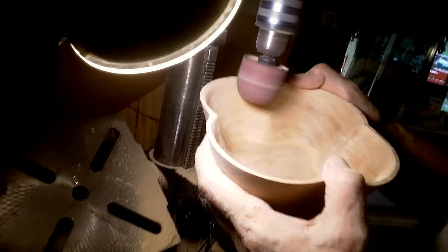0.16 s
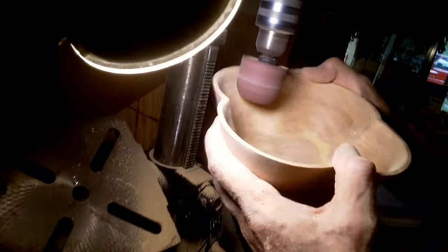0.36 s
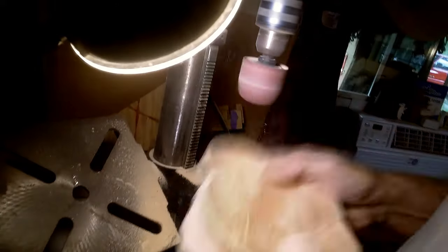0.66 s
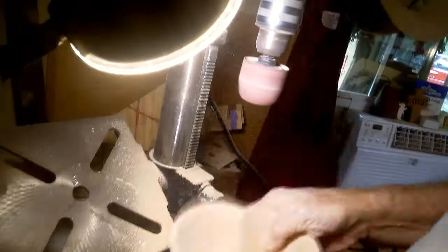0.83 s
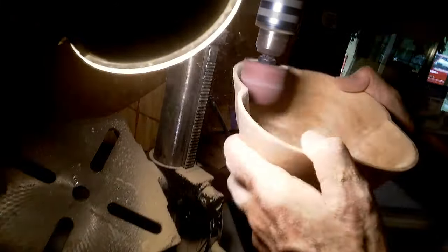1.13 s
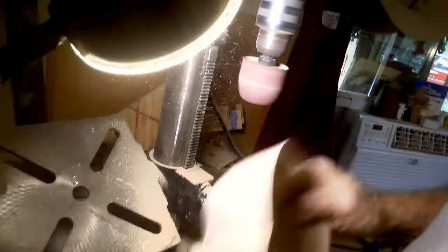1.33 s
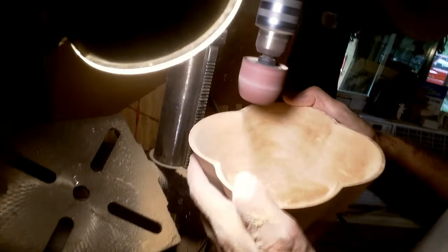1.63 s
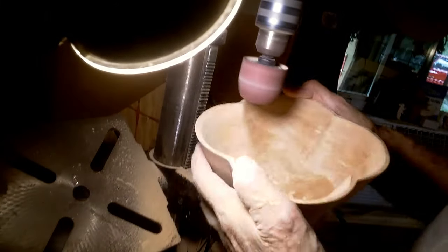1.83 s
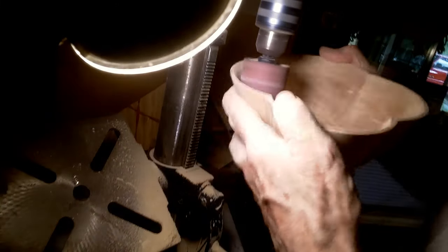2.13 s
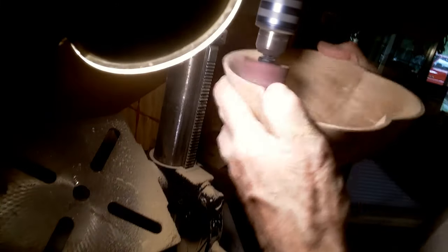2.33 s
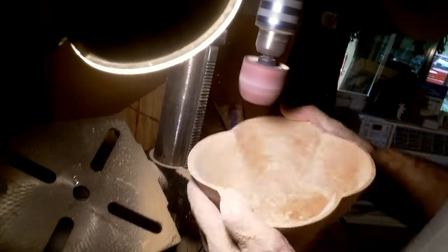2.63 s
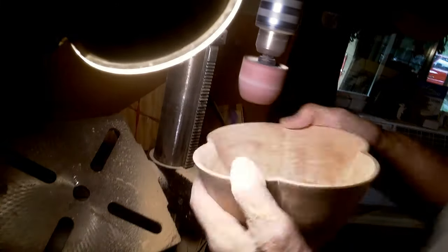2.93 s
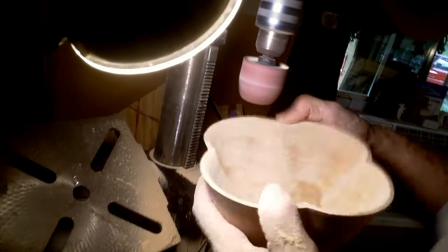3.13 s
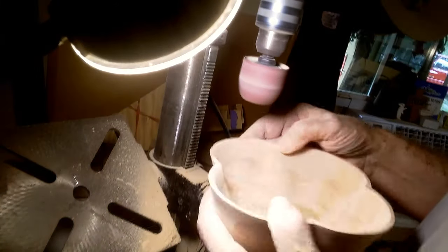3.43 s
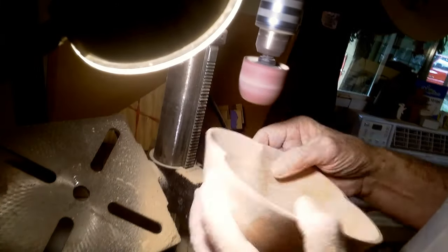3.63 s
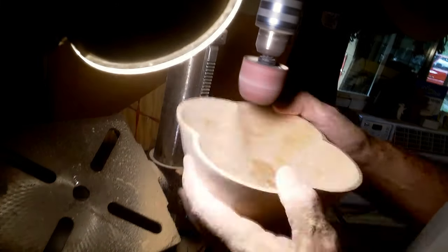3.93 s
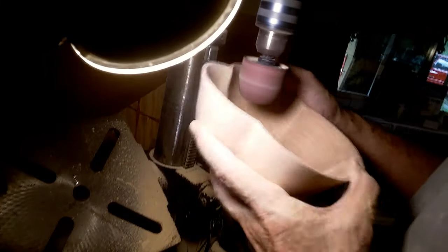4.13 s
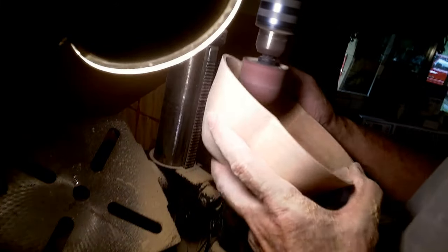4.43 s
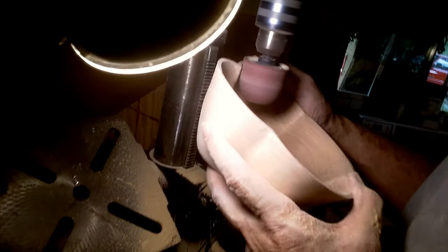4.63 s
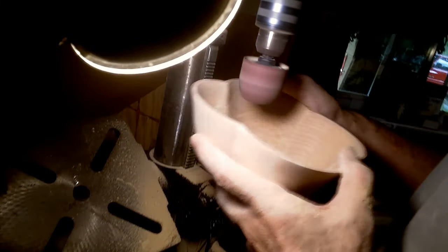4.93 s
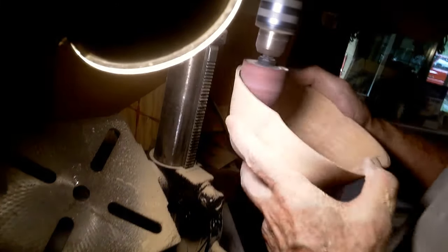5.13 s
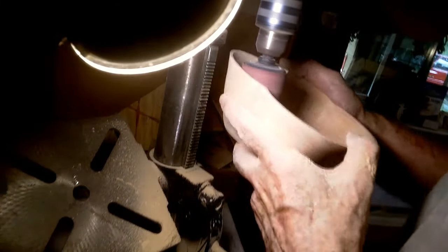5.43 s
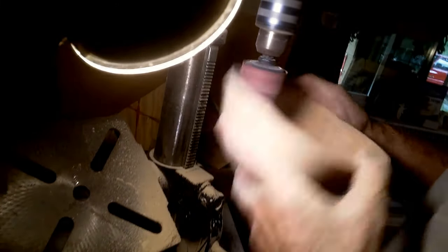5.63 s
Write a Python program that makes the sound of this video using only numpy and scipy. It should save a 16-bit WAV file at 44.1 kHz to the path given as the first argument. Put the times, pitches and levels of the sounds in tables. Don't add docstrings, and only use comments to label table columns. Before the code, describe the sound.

Bright sandpaper scratching on hollow wood arrives in separate strokes over a throbbing low motor drone. The first four strokes are smooth, raspy or dry; a pause of louder hum holds faint skin-on-wood wipes; then bouncing, ringing contacts lead to a long softer stroke. Close, dry camera sound with automatic gain pumping, slight room tail, and a loose, phasey stereo image with a duller right side.

```python
import sys
import numpy as np
from scipy import signal
from scipy.fft import rfft, irfft, next_fast_len
from scipy.io import wavfile
from scipy.ndimage import uniform_filter1d, minimum_filter1d, map_coordinates

SR = 44100
rng = np.random.default_rng(int(sys.argv[2]) if len(sys.argv) > 2 else 0)


def generate_wav(sig):
    pcm = np.round(np.clip(np.atleast_2d(sig).T, -1, 1) * 32767).astype(np.int16)
    wavfile.write(sys.argv[1], SR, pcm)


def amplitude_ratio(level_db):
    exponent = np.asarray(level_db, float) / 20
    return 10 ** exponent


N = 254456
TIME = np.arange(N) / SR

MOTOR_TONES = [51, 150.7, 177.6, 298.8, 360.7, 482.5, 777.9, 861.3, 1286.6]
# level_db, level_wander_db, pitch_wander_hz
TONE_WANDER = [(-24, 1.5, 1.7), (-5, 1, 1.197), (-3, 1, 0.74), (-23.5, 0.5, 1.5), (-20, 5.5, 2.47),
               (-11, 2, 2.5), (-33, 5, 3.98), (-32, -2, 4.22), (-30, -0.5, 9)]
# pitch_hz, level_db (per Hz)
RUMBLE_COLOUR = [(22, -30), (50, -13), (85, -10), (150, 4.5), (210, -6), (400, 1.5), (640, -8.5),
                 (1020, -21), (1300, -20), (2030, -35.5), (2800, -30), (6500, -45.5), (11000, -39),
                 (14320, -46)]
# pitch_hz, width_hz, level_db
HOUSING_RINGS = [(727, 4, -25.5), (11100, 770, -61), (2557, 370, -37.5), (3090, 220, -39),
                 (4600, 270, -38.5)]
# time_s, hiss_db
PRESSURE = [
    [(-.05, -47.5), (.09, -47), (.152, -44), (.224, -40.5), (.312, -43.5), (.404, -41.5), (.55, -40),
     (.619, -44)],
    [(.662, -42.5), (.68, -40.5)],
    [(1.067, -45), (1.185, -40), (1.249, -42)],
    [(2.026, -42.5), (2.107, -49), (2.145, -45), (2.28, -39.5), (2.36, -41.5), (2.445, -47.5), (2.49, -43),
     (2.537, -43.5)],
    [(2.864, -41.5), (2.866, -45)],
    [(4.268, -47), (4.295, -42.5), (4.34, -42), (4.42, -39), (4.49, -39), (4.572, -48)],
    [(4.625, -39), (4.7, -40.5), (4.742, -40), (4.81, -48.5), (4.852, -38.5), (4.879, -49)],
    [(5.037, -40.5), (5.1, -41.5), (5.27, -41.5), (5.341, -48.5), (5.47, -47), (5.545, -43), (5.6, -54),
     (5.642, -43)],
]
# fade_s, rasp_db, body_db, wall_ring_db, swing_per_turn_db
STROKE_SOUND = [
    (0.011, -11.5, 1.5, -17, -0.06),
    (0.015, -1, 5.5, -11.5, 0.5),
    (0.016, -12.5, -1.5, -31, -1),
    (0.015, -12.5, 3, -21, -0.1),
    (0.009, -20, -9, -31, 7),
    (0.017, -11.5, -1.5, -2.5, 1.5),
    (0.0062, -10.5, -0.5, -2.5, 2.5),
    (0.014, -15, -3, -14.5, 0),
]
# middle_s, half_length_s, depth_db
BOUNCES = [
    (4.288, 0.017, 19),
    (4.326, 0.0085, 14),
    (4.365, 0.0052, 6),
    (4.437, 0.0059, 6),
    (4.467, .0041, 7),
    (4.51, 0.0036, 2),
    (4.643, 0.014, 9),
    (4.679, 0.0027, 2),
    (4.804, 0.0025, 12),
    (4.834, 0.012, 7),
]
# middle_s, half_length_s, hiss_db
FINGER_WIPES = [
    (2.835, 0.026, -68),
    (3.23, 0.033, -62),
    (3.29, 0.022, -64),
    (3.388, .05, -60),
    (3.517, 0.018, -62.5),
    (5.772, 0.0055, -58),
]
# pitch_hz, level_db (per Hz)
HISS_COLOUR = [(4000, -27), (5500, -14.5), (8000, -8), (10000, -4), (11800, 1.5), (13000, -1),
               (14320, -13.5)]
# pitch_hz, level_db (per Hz)
RASP_COLOUR = [(1400, 0), (2000, -4.5), (2900, 3), (4000, 1), (5200, 2), (6500, -16.5), (8000, -10)]
# pitch_hz, level_db (per Hz)
BODY_COLOUR = [(120, -5), (250, 7), (550, 13.5), (800, 8), (1300, -3), (1900, -17), (2600, -5)]
# pitch_hz, width_hz, level_db
WALL_RINGS = [(930, 120, -4), (1190, 280, 3.5), (1460, 36, -23), (1738, 230, -0.5), (3430, 160, -7.5),
              (6470, 1400, -13)]
# pitch_hz, level_db, phase_rad
RIGHT_CHANNEL = [(40, -2, 1.1), (100, -3, 1.6), (145, -2.2, 2.0), (185, -2.2, 1.1), (250, -1.5, -2.3),
                 (300, -6, -2.3), (350, -13, -.7), (440, -8, -.95), (700, -3, -.4), (1100, -1.2, 0),
                 (3500, -1.5, 0), (6000, -4, 0), (10000, -12.5, 0), (14500, -21, 0)]
# pitch_hz, stray_rad
PHASE_STRAY = [(40, .35), (90, 1.0), (140, .2), (190, .2), (300, 1.1), (450, .4), (1100, .4), (1700, .8),
               (5500, .9), (7000, 1.6), (14000, 1.7)]
STEREO_BANDS = [48, 56, 64, 72, 80, 88, 96, 108, 120, 132, 144, 160, 176, 186, 196, 216, 240, 264, 292, 320]


def level(x, db):
    return x * amplitude_ratio(db) / np.sqrt(np.mean(x ** 2))


def colour(x, points):
    hz, db = np.transpose(points)
    size = next_fast_len(N)
    f = np.fft.rfftfreq(size, 1 / SR) + 1
    gain = amplitude_ratio(np.interp(np.log(f), np.log(hz), db, left=-90, right=-90))
    return level(irfft(rfft(x, size) * gain, size)[:N], 0)


def modes(x, table):
    rings = 0
    for hz, width_hz, db in table:
        b, a = signal.iirpeak(hz, hz / width_hz, SR)
        rings = rings + level(signal.lfilter(b, a, x), db)
    return rings


def walk(rate):
    k = int(SR / rate)
    steps = np.repeat(rng.standard_normal(N // k + 1), k)
    w = uniform_filter1d(uniform_filter1d(steps, k), k)[:N]
    return w / np.std(w)


def grit(flicker_db, spike_db):
    size = amplitude_ratio(spike_db * rng.exponential(size=N))
    flicker = amplitude_ratio(flicker_db * walk(220) + flicker_db * walk(30))
    return rng.standard_normal(N) * size * flicker


def motor():
    hum = 0
    for hz, (db, wander_db, wander_hz) in zip(MOTOR_TONES, TONE_WANDER):
        loudness = np.sqrt(2) * amplitude_ratio(db + wander_db * walk(16))
        phase = 2 * np.pi * np.cumsum(hz + wander_hz * walk(9)) / SR
        hum = hum + loudness * np.sin(phase + 7 * rng.random())
    belt_hz = 27.9 + 0.69 * walk(3.26)
    throb = np.sin(2 * np.pi * np.cumsum(belt_hz) / SR)
    shake = grit(0.25, 1.85) * amplitude_ratio(0.56 * throb)
    rumble = colour(shake, RUMBLE_COLOUR) * amplitude_ratio(-4)
    return hum + rumble + modes(shake, HOUSING_RINGS)


def gate(t0, t1, rise=0.0017, fall=0.006):
    return np.clip(np.minimum((TIME - t0) / rise, (t1 - TIME) / fall + 1), 0, 1) ** 2


def contact():
    return np.array([gate(rows[0][0], rows[-1][0], fall=stroke[0])
                     for rows, stroke in zip(PRESSURE, STROKE_SOUND)])


def pressure():
    s, db = np.transpose(np.vstack(PRESSURE))
    return np.interp(TIME, s, db)


def patchy(x, patch_db, patch_hz, patch_s):
    f, t, z = signal.stft(x, SR, nperseg=256)
    field = rng.standard_normal((40, 400))
    places = np.meshgrid(f / patch_hz, t / patch_s, indexing="ij")
    patches = map_coordinates(field, places, order=1, mode="wrap")
    return signal.istft(z * amplitude_ratio(patch_db * patches), SR, nperseg=256)[1][:N]


def sanding(press_db, on):
    _, rasp_db, body_db, ring_db, swing_db = np.transpose(STROKE_SOUND)
    drum_hz, low_spot_s = 27.5, 4.291
    throb = amplitude_ratio(-(swing_db @ on) * np.cos(2 * np.pi * drum_hz * (TIME - low_spot_s)))
    bounce = amplitude_ratio(-sum(db * np.exp(-((TIME - s) / half) ** 4) for s, half, db in BOUNCES))

    firm_db = -43
    rasp_push = amplitude_ratio(firm_db + 0.47 * (press_db - firm_db))
    body_push = amplitude_ratio(firm_db + 0.4 * (press_db - firm_db))

    grains = grit(1.2, 2.2)
    scratch = patchy(grains, patch_db=1.8, patch_hz=600, patch_s=0.04)
    wall = level(modes(modes(grains, WALL_RINGS), WALL_RINGS), 0)
    hiss = on.sum(axis=0) * amplitude_ratio(press_db) * colour(scratch, HISS_COLOUR)
    rasp = amplitude_ratio(rasp_db + 1.5) @ on * rasp_push * colour(scratch, RASP_COLOUR)
    body = amplitude_ratio(body_db - 4.5) @ on * body_push * colour(scratch, BODY_COLOUR)
    ring = amplitude_ratio(body_db + ring_db) @ on * body_push * wall
    return amplitude_ratio(5.0) * throb * bounce * (hiss + rasp + body + ring)


def gain_control(press_db, on):
    ceiling_db, squeeze, start_db = -56, 0.86, -11
    attack_s, hold_s, recover_db_per_s = 0.0037, 0.054, 41.5
    hiss_db = press_db + 20 * np.log10(on + 1e-9)
    want = -squeeze * np.maximum(hiss_db - ceiling_db, 0)
    want[0] = start_db
    hold = int(hold_s * SR)
    want = minimum_filter1d(want, hold, origin=(hold - 1) // 2)
    ramp = recover_db_per_s * TIME
    gain_db = ramp + np.minimum.accumulate(want - ramp)
    return uniform_filter1d(gain_db, int(attack_s * SR))


def workshop(near):
    t = np.arange(SR // 4) / SR
    tail = rng.standard_normal(len(t)) * np.exp(-np.log(1000) * t / 0.085) * (t > 0.004)
    tail = tail / np.sqrt(np.sum(tail ** 2))
    return amplitude_ratio(-47) * signal.fftconvolve(near, tail)[:N]


def wiping():
    on = sum(amplitude_ratio(db) * np.exp(-((TIME - s) / half) ** 4) for s, half, db in FINGER_WIPES)
    scratch = grit(2.5, 1.5)
    return on * (colour(scratch, HISS_COLOUR) + amplitude_ratio(-3.5) * colour(scratch, RASP_COLOUR))


def scene():
    press_db, on = pressure(), contact()
    near = sanding(press_db, on) + wiping()
    heard = motor() * amplitude_ratio(-36.5) + near + workshop(near)
    mono = heard * amplitude_ratio(gain_control(press_db, on.max(axis=0)))
    return np.array([mono, mono])


def right_channel(left):
    hz, db, phase = np.transpose(RIGHT_CHANNEL)
    f = np.fft.rfftfreq(N, 1 / SR) + 1
    place, points = np.log(f), np.log(hz)
    turn = np.interp(place, points, np.cos(phase)) + 1j * np.interp(place, points, np.sin(phase))
    gain = amplitude_ratio(np.interp(place, points, db)) * turn / np.abs(turn)
    late_inverted = -np.exp(-2j * np.pi * f * 20 / SR)
    return irfft(rfft(left) * gain * late_inverted, N)


def joint_stereo(left, right, weak_db=-11.5, busy_db=9, makeup_db=0.8):
    frames = dict(window=np.sin(np.pi * (np.arange(2048) + 0.5) / 2048), nperseg=2048)
    f, _, (l, r) = signal.stft(np.pad([left, right], ((0, 0), (6, 0))), SR, **frames)
    count = r.shape[1]
    height = f[:, None]

    hz, rad = np.transpose(PHASE_STRAY)
    stray = np.interp(np.log(f + 1), np.log(hz), rad)[:, None]
    draws = rng.random((2, len(f) // 14 + 1, count))
    spin, luck = np.repeat(draws, 14, axis=1)[:, :len(f)]
    loose = r * amplitude_ratio(makeup_db * stray) * np.exp(1j * stray * np.sqrt(12) * (spin - 0.5))

    loose[luck < 0.3 * np.clip((height - 5500) / 3000, 0, 1)] = 0
    top_hz = np.repeat(rng.uniform(12900, 14500, count), 3)[:count]
    loose[height > top_hz] = 0

    power = np.abs(l) ** 2
    busy = np.sqrt(power[f > 6000].sum(axis=0) / power.sum(axis=0))
    for a, b in zip(STEREO_BANDS, STEREO_BANDS[1:]):
        mid = np.sum(np.abs(l[a:b] + r[a:b]) ** 2, axis=0)
        side = np.sum(np.abs(l[a:b] - r[a:b]) ** 2, axis=0)
        wobble_db = 2.0 * np.repeat(rng.standard_normal(count), 2)[:count]
        busy_share = min(b / 110, 1.7) if b < 300 else -0.3
        weak = amplitude_ratio(weak_db + busy_db * busy * busy_share + wobble_db) ** 2
        for sign, lost in ((-1, mid < side * weak), (0.77, side < mid * weak)):
            l[a:b, lost] = (l[a:b, lost] + sign * r[a:b, lost]) / 2
            loose[a:b, lost] = sign * l[a:b, lost]
    return signal.istft(np.array([l, loose]), SR, **frames)[1][:, 6:N + 6]


def band_limit(x):
    return signal.sosfilt(signal.butter(12, 14640, fs=SR, output="sos"), x)


def record(dry):
    mix = joint_stereo(dry[0], right_channel(dry[1]))
    return band_limit(mix)


dry = scene()
out = record(dry)
generate_wav(out)
```